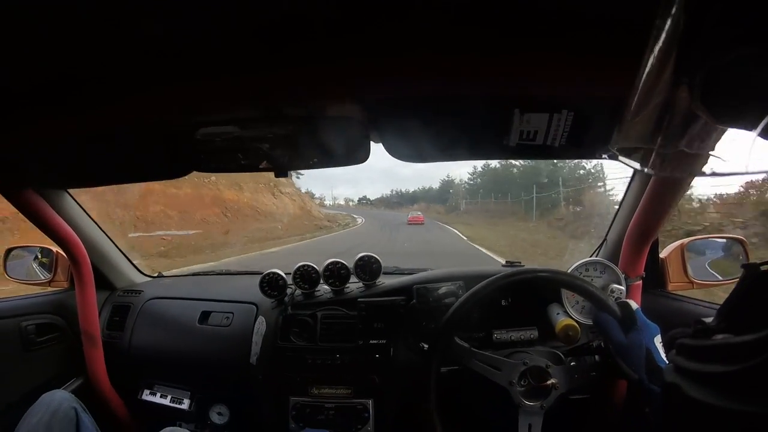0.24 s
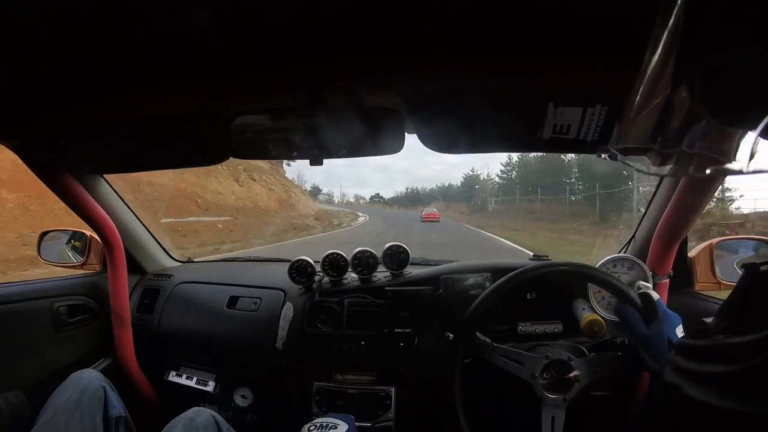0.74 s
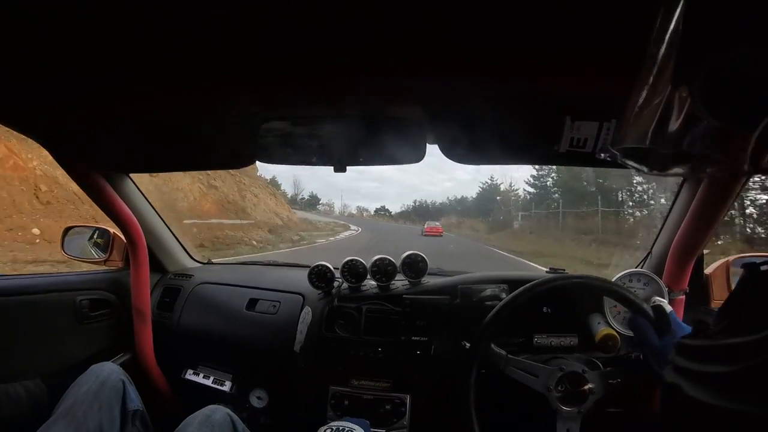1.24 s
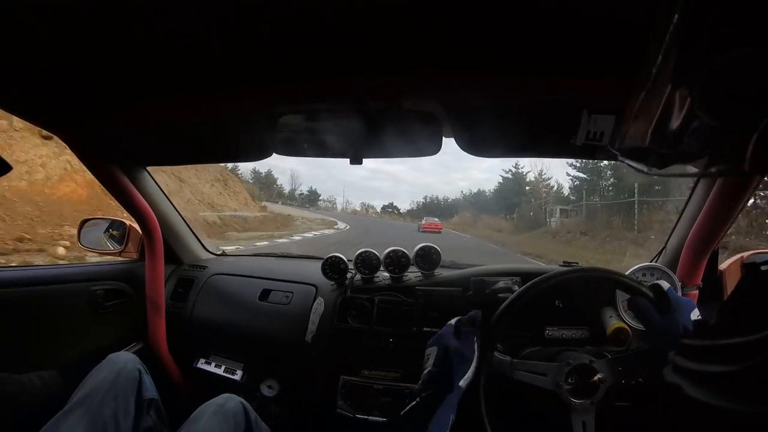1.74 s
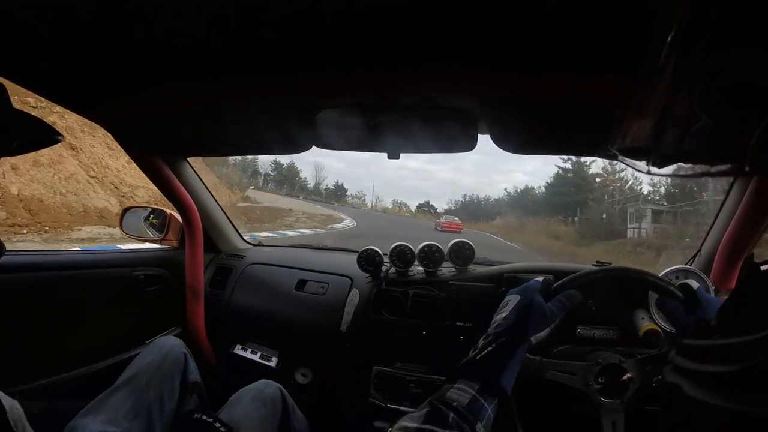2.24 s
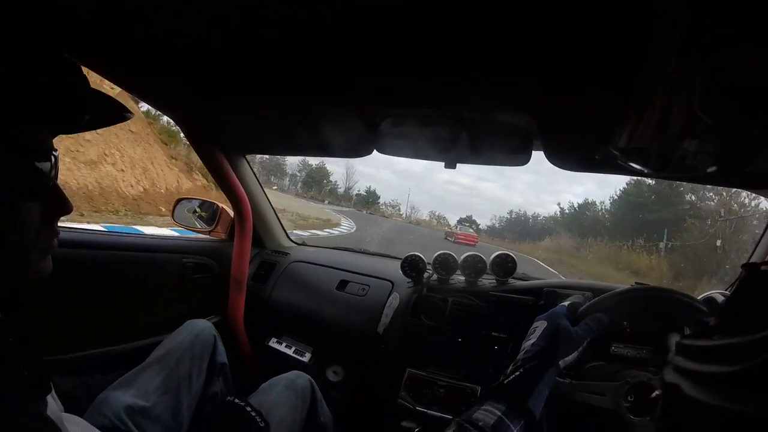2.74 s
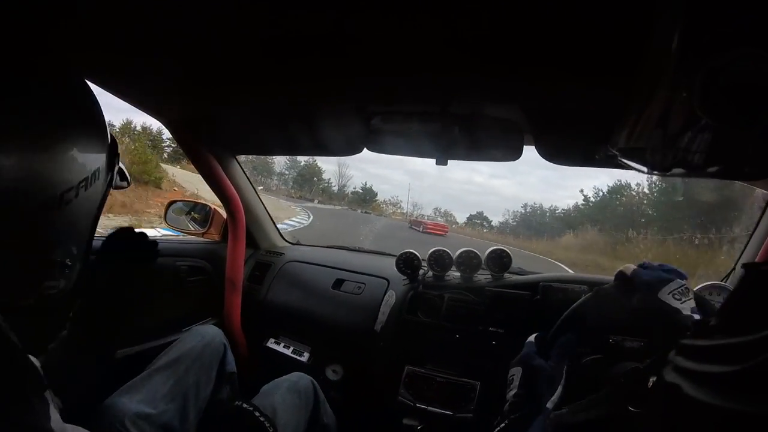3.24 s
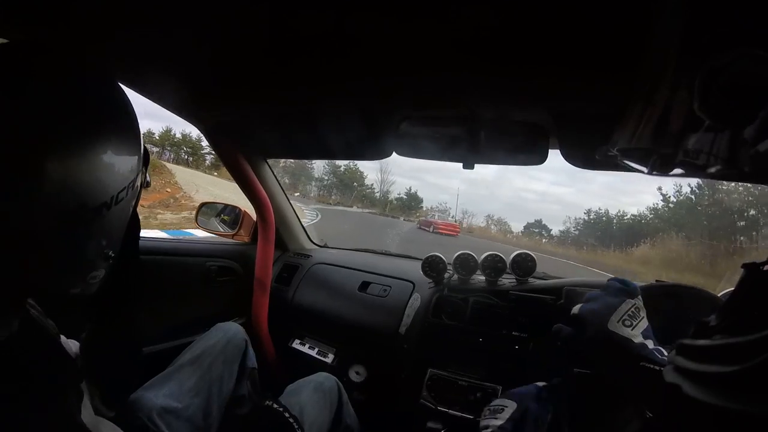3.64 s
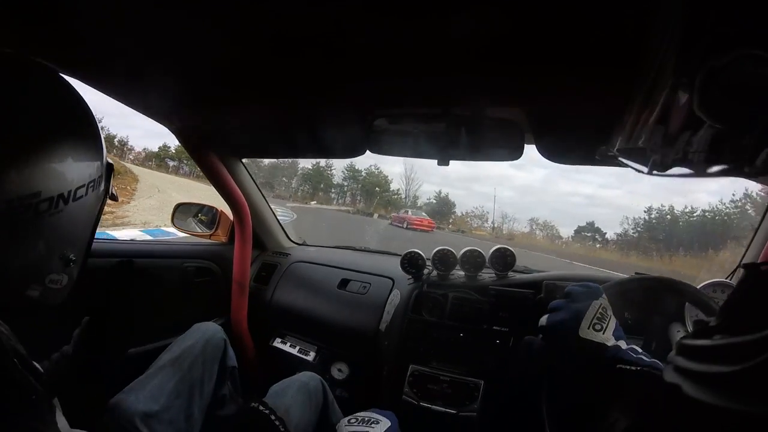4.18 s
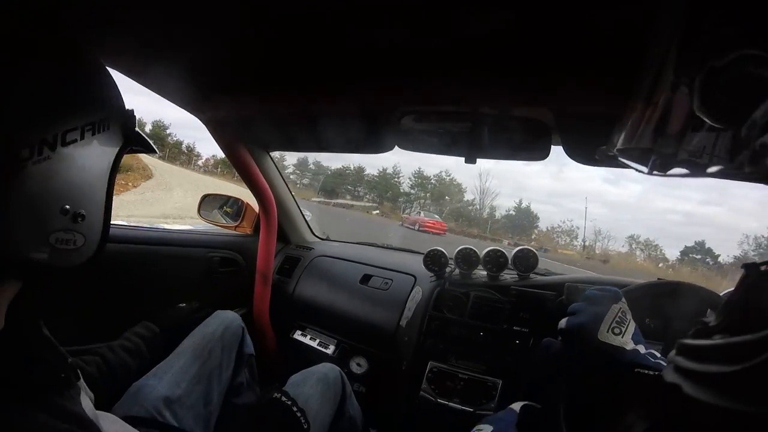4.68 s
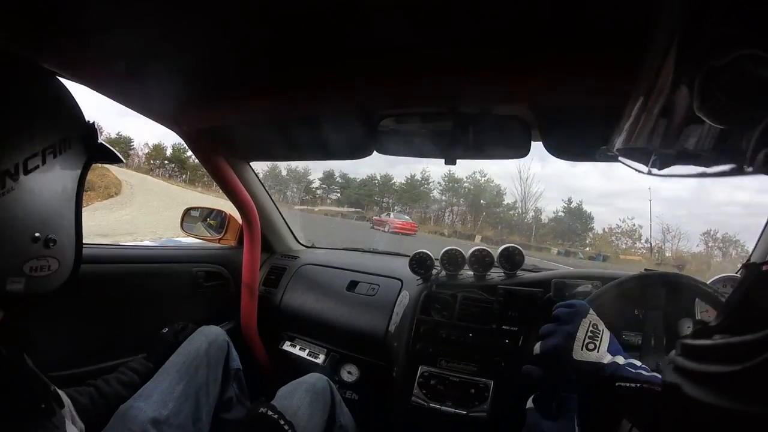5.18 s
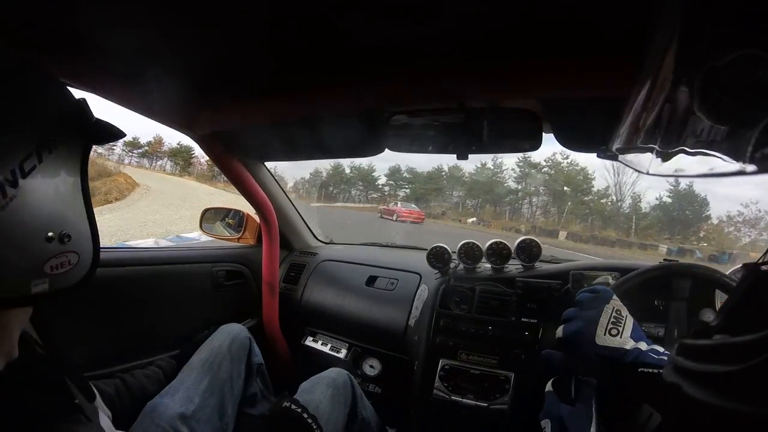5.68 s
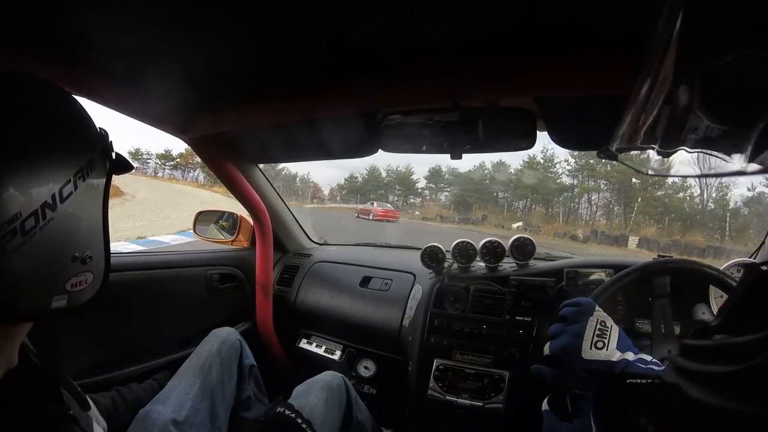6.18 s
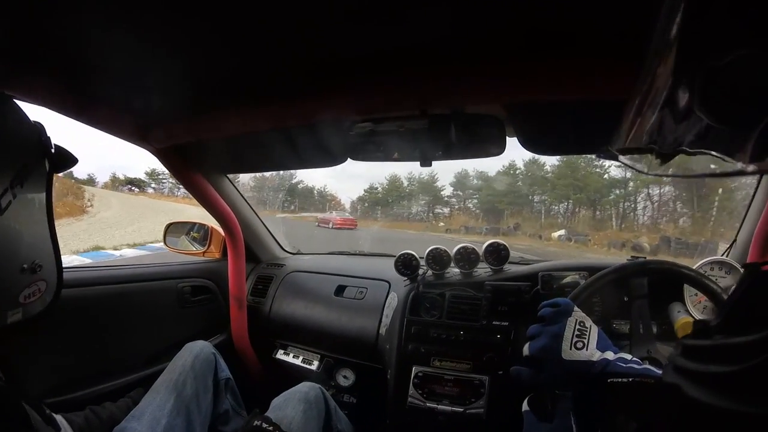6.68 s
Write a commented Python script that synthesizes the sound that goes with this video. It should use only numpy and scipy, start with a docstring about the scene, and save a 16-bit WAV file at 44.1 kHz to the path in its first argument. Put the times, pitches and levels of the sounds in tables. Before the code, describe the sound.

The sound is heard from inside a bare, resonant track car. From 0 to 4.1 s a six-cylinder engine coasts down on a closed throttle, its smooth hum gliding from about 195 Hz to 110 Hz and its roar gradually easing. Low body shake, muffled road rumble with irregular bumps and a thin hiss lie underneath. Tiny breathy squeaks near 4.8 kHz come in the first 0.6 s, with light ticks around 0.3, 1.05, 1.6 and 1.8 s. At about 4.2 s a click and gulp open a hoarse throttle blip: pitch nearly doubles by 4.47 s, with ringing intake pipes, then drops away. A low knock and thump land near 4.86 s as the clutch bites. The note dips and judders until 5.2 s, then pulls at a nearly steady 150 Hz, overtones thickening into a harder growl; a small tick at 5.58 s, ending at 6.9 s still under load.

```python
"""Downshift in a bare cabin

Inside a six-cylinder track car the engine slows on a closed throttle and is blipped for a downshift; the
clutch bites and the car pulls through a slide. Road noise is shaped noise, the pipes are resonances rung
by noise, and the engine is a sum of sines on multiples of crank speed. Knocks, short engine tones, noise
bursts and squeaks are brief enveloped sounds. The sound stops steeply just below 15 kHz."""
import sys
import numpy as np
from scipy import signal
from scipy.fft import rfft, irfft
from scipy.io import wavfile

SR = 44100
rng = np.random.default_rng(int(sys.argv[2]) if len(sys.argv) > 2 else 0)


def unload_audio(sound):
    """Save the sound as a 16-bit wav file, at the path given as the first command line argument."""
    columns = np.transpose(np.atleast_2d(sound))
    # keep every value between -1 and 1, then stretch to whole-number steps
    steps = np.round(np.clip(columns, -1, 1) * 32767)
    wavfile.write(sys.argv[1], SR, steps.astype(np.int16))


N = 305172  # samples


def from_db(db):
    """Logarithmic level: decibels to amplitude gain."""
    return 10 ** (np.asarray(db) / 20)


def rms_one(x):
    """Normalisation: scale to an rms value of 1."""
    return x / np.sqrt(np.mean(x ** 2) + 1e-20)


def in_time(rows):
    """Linear interpolation: table columns after the first become curves, one value a sample."""
    s, *columns = np.transpose(rows)
    t = np.arange(N) / SR
    return [np.interp(t, s, column) for column in columns]


def tents(s, height, half_s):
    """Superposition of straight rises and falls about given moments."""
    t = np.arange(N) / SR
    return sum(h * np.maximum(1 - np.abs(t - at) / half, 0) for at, h, half in np.broadcast(s, height, half_s))


def drift(width_hz):
    """Low-passed noise: a slow random curve of rms 1, from a double pole."""
    step = 40  # samples between drawn values
    r = np.exp(-2 * step * np.pi * width_hz / SR)
    white = rng.standard_normal(N // step + 2002)
    slow = signal.lfilter([1], [1, -2 * r, r * r], white)[2000:]  # drop the start-up
    return np.interp(np.arange(N) / step, np.arange(len(slow)), rms_one(slow))


def colour(x, spectrum, hollows=()):
    """Spectral shaping: a spectrum over log frequency plus bell-shaped resonances; rms 1."""
    hz = np.maximum(np.fft.rfftfreq(N, 1 / SR), 1)
    at, db = np.transpose(spectrum)
    shape_db = np.interp(np.log(hz), np.log(at), db, left=-200, right=-200)
    for centre_hz, width_hz, lift_db in hollows:
        shape_db += lift_db / (1 + (2 * (hz - centre_hz) / width_hz) ** 2)
    return rms_one(irfft(rfft(x) * from_db(shape_db), N))


def resonate(x, hz, width_hz):
    """Damped resonance: a pole pair with gain near 1 at its peak."""
    r = np.exp(-np.pi * width_hz / SR)
    zeros = (1 - r * r) / 2 * np.array([1, 0, -1])
    poles = [1, -2 * r * np.cos(2 * np.pi * hz / SR), r * r]
    return signal.lfilter(zeros, poles, x)


def resonate_twice(x, hz, width_hz):
    """Cascaded resonance: two equal pole pairs give steeper skirts; rms 1."""
    return rms_one(resonate(resonate(x, hz, width_hz), hz, width_hz))


def add(out, s, sound):
    """Superposition: mix a short sound in at a time."""
    i = round(s * SR)
    out[i:i + len(sound)] += sound[:N - i]


# Relative noise spectra of body shake, road rumble, panel drone, roar and hiss: f/Hz, density level/dB
SHAKE_SPECTRUM = [(10, -4), (17, -3), (25, -2), (32, -6), (38, -4), (44, 1), (49, -4), (55, -12), (70, -16),
                  (80, -30)]
RUMBLE_SPECTRUM = [(45, -9.5), (62, -14.5), (85, 11), (100, -1), (115, -9.5), (150, 6), (200, -23.5)]
DRONE_SPECTRUM = [(90, -12), (140, 8.5), (200, 6), (260, 2), (320, -2.5), (390, -4.5), (470, -8),
                  (560, -10), (650, -12.5), (800, -21), (1000, -27.5), (1400, -37)]
ROAR_SPECTRUM = [(410, -27.5), (700, -7.5), (870, -9.5), (1170, -2.5), (1610, -1.5), (1840, -6.5),
                 (2390, -8), (3150, -9.5), (3480, -17.5), (3940, -16.5), (4600, -22.5), (6000, -30),
                 (8500, -32), (12000, -49.5)]
HISS_SPECTRUM = [(2500, -14), (4000, -0.5), (5300, -2.5), (7000, -4.5), (9000, -8.5), (11000, -10),
                 (12000, -13), (13000, -12.5), (14000, -17), (16000, -16.5)]
# Hollow spaces that colour roar and hiss: f/Hz, width/Hz, lift/dB
HOLLOWS = [(1011, 51, 4), (1260, 52, -3.5), (1478, 170, 4), (1628, 210, 4.5), (1807, 120, -0.5),
           (2780, 180, 4), (3250, 300, 4.5), (3480, 110, 0), (3730, 150, 5.5), (5970, 290, 2)]
# Road noise levels, uneven through the drive, roar lower by the end; before throttle and flicker:
# t/s, roar level/dB, hiss level/dB, panel drone level/dB, body shake level/dB
ROAD_LEVELS = [(0, -50.5, -70, -42, -25.5), (.2, -51.5, -70.5, -45, -40), (.45, -52.5, -70, -46, -40),
               (.9, -54, -70, -45, -34.5), (1.8, -55, -71.5, -48, -42.5), (3.1, -56.5, -71.5, -48.5, -45),
               (4.1, -56.5, -71.5, -48, -42), (4.3, -57.5, -69.5, -43, -47), (4.5, -52.5, -71.5, -45, -41),
               (4.66, -55.5, -71.5, -45, -46), (4.9, -56, -71, -48, -38.5), (5.3, -58.5, -71.5, -48, -45.5),
               (5.7, -57.5, -72, -46, -48), (6.3, -59, -71, -48.5, -45), (6.92, -59, -70, -45, -46)]
# Bumps in the road that swell the rumble: t/s, lift/dB
ROAD_BUMPS = [(.1, 14.5), (1.14, -2), (1.46, 13), (1.9, 4), (3.64, 6), (3.83, 4), (4.17, 9), (4.89, 12),
              (5.08, 7), (5.5, 8), (5.67, 6.5), (5.99, 12.5)]
RUMBLE_DB, RUMBLE_WAVER_DB, BUMP_HALF_S = -50.5, 1, 0.061
ROAR_LOAD_DB, ROAR_BLIP_DB, DRONE_BLIP_DB, HISS_BLIP_DB = 5.5, 6, 2.5, -0.5  # change at full load or blip
FIRING_THROB_DB, TURN_THROB_DB = 1, 0.34  # the firing throb is heard only in the blip


def road_and_roar(angle, blip, load):
    """Broadband noise, amplitude-modulated: the shell shakes, rumbles and drones; roar throbs with the crank."""
    roar_db, hiss_db, drone_db, shake_db = in_time(ROAD_LEVELS)
    flicker = drift(14.0)  # one slow random flicker shared by roar, hiss and drone
    roar_db += ROAR_LOAD_DB * load ** 2 + ROAR_BLIP_DB * blip + 0.47 * flicker
    hiss_db += HISS_BLIP_DB * blip + 0.51 * flicker
    drone_db += DRONE_BLIP_DB * blip + 1.1 * flicker
    rumble_db = RUMBLE_DB + RUMBLE_WAVER_DB * drift(3.7)
    rumble_db += tents(*np.transpose(ROAD_BUMPS), BUMP_HALF_S)
    # three firings a turn
    throb = from_db(FIRING_THROB_DB * blip * np.cos(3 * angle) + TURN_THROB_DB * np.cos(angle))

    white = rng.standard_normal((5, N))
    out = from_db(shake_db) * colour(white[0], SHAKE_SPECTRUM)
    out += from_db(rumble_db) * colour(white[1], RUMBLE_SPECTRUM)
    out += from_db(drone_db) * colour(white[2], DRONE_SPECTRUM)
    out += from_db(roar_db) * colour(white[3] * throb, ROAR_SPECTRUM, HOLLOWS)
    return out + from_db(hiss_db) * colour(white[4], HISS_SPECTRUM, HOLLOWS)


# Wheels out of balance: t/s, turn rate f/Hz, thump rms level/dB
WHEEL_TURNS = [(0, 24.5, -53), (.4, 26, -49), (.8, 24, -33), (1.2, 24, -56), (1.6, 27, -40),
               (2, 15.2, -39.5), (2.4, 20, -46), (2.7, 16, -42), (3, 24, -73)]


def wheels():
    """Forced vibration by imbalance: one push on the shell for each turn, a sine at the turn rate."""
    turns, db = in_time(WHEEL_TURNS)
    return np.sqrt(2) * from_db(db) * np.sin(2 * np.pi * np.cumsum(turns) / SR)


# Short breathy squeaks: t/s, level/dB before the fade in and out, f/Hz, length/s
SQUEAKS = [(0.02, -70, 4820, 0.04), (0.08, -67, 4830, 0.05), (.435, -70, 4830, 0.035),
           (.53, -69, 4790, 0.04)]


def squeaks():
    """Narrow-band noise: a sharp resonance driven by noise, under a half-sine envelope."""
    out, t = np.zeros(N), np.arange(SR // 5) / SR
    for s, db, hz, length_s in SQUEAKS:
        breathy = resonate_twice(rng.standard_normal(len(t)), hz, 170)
        add(out, s, from_db(db) * breathy * np.sin(np.pi * np.minimum(t / length_s, 1)))
    return out


# Short noise bursts: ticks, intake gulps in the blip, thumps as the clutch bites:
# t/s, nominal peak level/dB, centre f/Hz, width/Hz, decay time constant/s
NOISE_BURSTS = [(0.295, -51, 8000, 6000, .006), (0.444, -61, 9000, 8000, .005),
                (1.05, -47, 4000, 4000, 0.0051), (1.586, -42, 2900, 1700, 0.01),
                (1.79, -48, 3300, 1992, 0.011), (1.856, -54, 3500, 2500, 0.0079),
                (3.959, -47, 2680, 3480, 0.024), (3.992, -56, 7500, 4000, .01),
                (4.176, -49, 1450, 502, .015), (4.2, -40, 1600, 600, 0.03), (4.21, -43, 720, 200, 0.023),
                (4.385, -31.5, 1630, 300, 0.035), (4.417, -44, 3000, 800, 0.018),
                (4.855, -40, 1500, 600, 0.012), (4.854, -35.5, 330, 330, 0.04),
                (4.875, -41, 560, 300, 0.038), (4.973, -50.5, 7000, 4000, 0.0084),
                (5.578, -41.5, 3300, 2000, 0.007), (5.579, -53, 6200, 2500, 0.004),
                (6.659, -54, 6500, 4000, 0.0099)]
BURST_CREST_DB, BURST_RISE_S = 9.0, 0.0038  # nominal peak over rms of the noise, and rise time


def noise_bursts():
    """Impulsive excitation: puffs of band-passed noise with a quick rise and exponential decay."""
    out, t = np.zeros(N), np.arange(SR // 5) / SR
    for s, db, hz, width_hz, decay_s in NOISE_BURSTS:
        puff = resonate_twice(rng.standard_normal(len(t)), hz, width_hz)
        envelope = np.minimum(t / BURST_RISE_S, 1) * np.exp(-t / decay_s)
        add(out, s, from_db(db - BURST_CREST_DB) * puff * envelope)
    return out


# Knocks, and short engine tones dying away after the blip:
# t/s, starting amplitude level/dB, f/Hz, time to fall 60 dB t60/s
KNOCKS_AND_TONES = [(4.202, -47, 300, 0.031), (4.46, -20.5, 105, 0.028), (4.566, -45.5, 375, .3),
                    (4.574, -34, 87.2, 1), (4.661, -53, 255, 0.32), (4.69, -31, 28, 0.15),
                    (4.862, -39.5, 332, 0.24), (4.867, -29, 45, .1), (4.887, -22.5, 91, 0.048)]


def knocks_and_tones():
    """Exponential decay: each knock or tone is a sine of fixed pitch dying away, ended after 0.2 s."""
    out, t = np.zeros(N), np.arange(SR // 5) / SR
    for s, db, hz, t60_s in KNOCKS_AND_TONES:
        add(out, s, -from_db(db - 60 * t / t60_s) * np.sin(2 * np.pi * hz * t))
    return out


# Two pipes sing while the throttle is blipped: mean f/Hz, level/dB at best breath before waver
PIPE_NOTES = [(740, -51), (1068, -56)]
NOTE_WAVER_DB, NOTE_WANDER_HZ = 2.0, 9  # rms
NOTE_DB_PER_OCTAVE = 16  # loss away from the speed of best breath


def pipe_notes(octaves, blip):
    """Self-sustained tones: held notes, unsteady in pitch and level, that swell with the air flow."""
    out = 0
    for mean_hz, db in PIPE_NOTES:
        level_db = db + NOTE_WAVER_DB * drift(25)
        hz = mean_hz + NOTE_WANDER_HZ * drift(30)
        out += np.sqrt(2) * from_db(level_db) * np.sin(2 * np.pi * np.cumsum(hz) / SR)
    return blip * from_db(NOTE_DB_PER_OCTAVE * octaves) * out


# Pipe resonances, strongest in the blip; three parts that add, before flicker:
# f/Hz, width/Hz, closed level/dB, blipped level/dB at best breath, full load level/dB
PIPE_RINGS = [(525, 120, -79.5, -44, -63), (739, 35, -78.5, -53.5, -72.5), (780, 270, -72.5, -54, -69.5),
              (1068, 45, -76, -60, -73), (1288, 56, -80, -55, -65), (1500, 120, -70, -51.5, -61),
              (1628, 126, -65, -47.5, -64), (1857, 70, -84, -56, -63.5), (1986, 110, -71, -61, -68.5),
              (2708, 250, -77, -55, -64), (3040, 240, -87.5, -54.5, -66), (3900, 190, -80, -64.5, -72.5),
              (6160, 770, -83, -68, -84)]
INTAKE_DB_PER_OCTAVE = 21.5  # loss of the blipped part away from the speed of best breath
FIRING_GULP_DB, TURN_GULP_DB, PIPE_FLICKER_DB = 3, 2, 2.5


def intake(angle, octaves, blip, load, closed_db):
    """Resonators driven by pulsed noise: air gulped once a firing rings the pipes; flicker fades in the blip."""
    gulps = from_db(FIRING_GULP_DB * np.cos(3 * angle) + TURN_GULP_DB * np.cos(angle))
    air = rng.standard_normal(N) * gulps
    blip_flow = blip * from_db(INTAKE_DB_PER_OCTAVE * octaves)
    out = 0
    for hz, width_hz, shut_db, blip_db, load_db in PIPE_RINGS:
        gain = from_db(shut_db + closed_db) + blip_flow * from_db(blip_db) + load ** 2 * from_db(load_db)
        flicker = from_db(PIPE_FLICKER_DB * (1 - blip) * drift(9.0))  # each ring on its own
        out += gain * flicker * resonate_twice(air, hz, width_hz)
    return out


# Other orders of the crank speed, among them two low tones at 1.5 and 1.67 times crank speed; # levels before
# blip, load, cabin and waver terms: # multiple of crank speed, closed throttle level/dB, half load level/dB,
# full load level/dB
OTHER_ORDERS = [(1.5, -54.5, -59.5, -51.5), (1.67, -51, -67, -67), (2, -54, -59, -60),
                (2.5, -57, -63.5, -69.5), (3.5, -54.5, -59, -36.5), (4, -52.5, -54, -52),
                (4.5, -55.5, -74.5, -68.5), (5, -58.5, -50, -50.5), (5.5, -74, -54.5, -59),
                (7, -68.5, -52, -52.5), (7.5, -68, -57, -65), (8, -68, -55.5, -52.5),
                (10, -72.5, -74, -83.5), (11, -78.5, -85, -56.5), (13, -81.5, -75, -65),
                (14, -79, -66.5, -55.5), (15, -65, -67.5, -64), (16, -78, -68.5, -61),
                (17, -75, -74.5, -65)]
# The cabin favours some pitches: f/Hz, gain level/dB
CABIN_RESPONSE = [(65, -22), (75, 0), (92, 3), (120, -6.5), (160, -1), (195, -4), (250, 5.5), (310, 0),
                  (385, 4.5), (440, -0.5), (520, 6), (590, -3.5), (680, -7), (740, -4.5), (900, -12)]
ORDER_BLIP_DB, ORDER_LOAD_DB, ORDER_WAVER_DB = -6, -4, 1.5


def other_orders(angle, turns, blip, load):
    """Order spectrum: sines locked to further multiples of crank speed, shaped by the cabin response."""
    hz, cabin_db = np.transpose(CABIN_RESPONSE)
    out = 0
    for k, *by_load_db in OTHER_ORDERS:
        level_db = np.interp(load, [0, .5, 1], by_load_db) + ORDER_BLIP_DB * blip + ORDER_LOAD_DB * load
        level_db += ORDER_WAVER_DB * drift(12.0)
        level_db += np.interp(np.log(k * turns), np.log(hz), cabin_db)
        out += from_db(level_db) * np.sin(k * angle + rng.uniform(0, 2 * np.pi))
    return np.sqrt(2) * out


# How loud firing note and overtones come through at each pitch, before order offsets, load, waver and dips:
# f/Hz, closed throttle level/dB, blipped level/dB
FIRING_BY_PITCH = [(107, -41, -31), (127.6, -40, -33.5), (133, -37, -32), (151.5, -32, -25.5),
                   (161, -33, -27.5), (163.7, -32, -24.5), (172.4, -36.5, -26), (183.5, -36, -37),
                   (184.4, -40, -41), (201, -35, -28.5), (205, -38, -26), (211, -49, -43),
                   (245, -41, -44.5), (268.4, -49, -49), (278.4, -60, -62), (299.4, -58, -46),
                   (326, -66.5, -46), (370.5, -61.5, -35.5), (387, -56, -30.5), (432, -65.5, -39),
                   (470, -64.5, -41), (510, -80, -40), (567, -60.5, -31), (576, -64, -40),
                   (590, -48.5, -42)]
# Firing note and overtones: multiple of crank speed, closed throttle offset level/dB,
# blipped offset level/dB, lift/dB at load 0.6, at 0.8 and at 1
FIRING_ORDERS = [(3, 0.4, 0.4, -0.2, 3.8, 4.7), (6, -2.94, 0.4, 1, 6, 8), (9, 0.8, -7.5, 2, 17.5, 17.6),
                 (12, -22.5, -22.5, 1, 9.5, 13)]
# Dips as the clutch goes out, bites and judders: t/s, depth/dB (below 0 a swell), half length/s
CLUTCH_DIPS = [(4.5, 4.5, 0.099), (4.62, 14, 0.18), (4.893, 10, 0.041), (5.052, 7.5, 0.051),
               (5.13, 6.5, 0.05), (5.202, 13, 0.037), (5.468, 3, 0.095), (5.58, -2.5, 0.049),
               (5.668, 1, 0.031), (6.3, 1.5, 0.55)]
FIRING_WAVER_DB = 0.59  # rms, fading out in the blip


def firing(angle, turns, blip, load):
    """Harmonic series of periodic firing: three firings a turn and overtones, louder with load."""
    pitch_hz, shut_db, open_db = np.transpose(FIRING_BY_PITCH)
    common_db = FIRING_WAVER_DB * (1 - blip) * drift(3.7) - tents(*np.transpose(CLUTCH_DIPS))
    out = 0
    for k, shut_offset_db, blip_offset_db, *lift_db in FIRING_ORDERS:
        closed_db = shut_offset_db + np.interp(k * turns, pitch_hz, shut_db)
        blipped_db = blip_offset_db + np.interp(k * turns, pitch_hz, open_db)
        level_db = closed_db + blip * (blipped_db - closed_db)
        level_db += np.interp(load, [0, .6, .8, 1], [0, *lift_db])
        out += from_db(level_db + common_db) * np.sin(k * angle + k)
    return np.sqrt(2) * out


# Crank speed: t/s, turn rate f/Hz
CRANK_SPEED = [(0, 65), (.21, 63.6), (.75, 59.8), (1.04, 56.8), (1.19, 56.7), (1.35, 54.9), (2.1, 49),
               (2.3, 47.6), (3.4, 42.1), (3.7, 40.4), (4, 39.4), (4.12, 36.7), (4.18, 36), (4.2, 37),
               (4.22, 40), (4.26, 43.2), (4.32, 50.7), (4.4, 61.4), (4.44, 65), (4.47, 67.2), (4.55, 63.1),
               (4.63, 61.5), (4.7, 57.1), (4.81, 53.7), (4.87, 54.4), (5.16, 54.2), (5.41, 51.8),
               (5.51, 51.9), (5.78, 50.8), (5.88, 51.3), (6.06, 51.05), (6.18, 50.4), (6.47, 50.2),
               (6.57, 50.5), (6.78, 49.9), (6.92, 50.2)]
# Throttle blip with the clutch out: t/s, opening 0-1
THROTTLE_BLIP = [(4.165, 0.0), (4.2, .8), (4.24, 1.0), (4.462, 1.0), (4.48, 0.0)]
# Load through the driveline: t/s, load 0-1
DRIVELINE_LOAD = [(0, 0.03), (1.2, 0), (5.0, 0.07), (5.15, 0.42), (5.65, 0.64), (5.78, 0.76), (6.1, 0.87),
                  (6.4, 0.93), (6.92, 1)]
BEST_BREATH_HZ = 59.6  # crank turn rate at which air flow peaks


def scene():
    """Linear superposition: all sources sum at one microphone, sharing crank angle, blip and load."""
    (turns,), (blip,), (load,) = in_time(CRANK_SPEED), in_time(THROTTLE_BLIP), in_time(DRIVELINE_LOAD)
    load = np.clip(load, 0.0, 1.0)
    angle = 2 * np.pi * np.cumsum(turns) / SR
    octaves = -np.abs(np.log2(turns / BEST_BREATH_HZ))  # 0 at best breath, negative away from it
    roar_db = in_time(ROAD_LEVELS)[0]
    closed_db = roar_db - roar_db.mean()  # the closed-throttle ring follows the road roar

    out = road_and_roar(angle, blip, load) + wheels()
    out += squeaks() + noise_bursts() + knocks_and_tones()
    out += pipe_notes(octaves, blip) + intake(angle, octaves, blip, load, closed_db)
    out += other_orders(angle, turns, blip, load) + firing(angle, turns, blip, load)
    return out[None]


CUTOFF_HZ = 14950


def record(dry):
    """Low-pass filtering: a steep elliptic filter stops the sound just below 15 kHz."""
    low_pass = signal.ellip(10, .5, 60, CUTOFF_HZ, fs=SR, output="sos")  # 0.5 dB ripple, 60 dB stop band
    return signal.sosfilt(low_pass, dry)


dry = scene()
out = record(dry)
unload_audio(out)
```